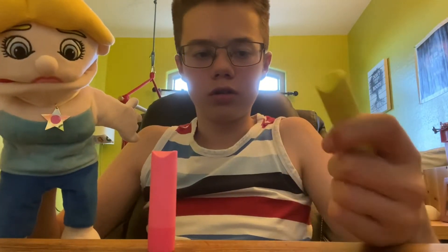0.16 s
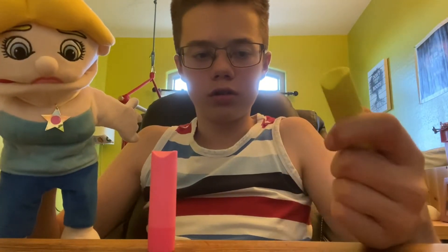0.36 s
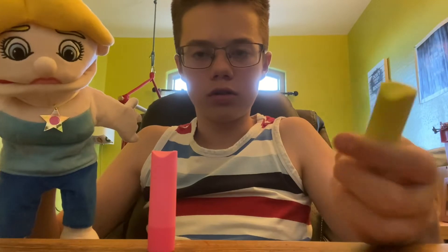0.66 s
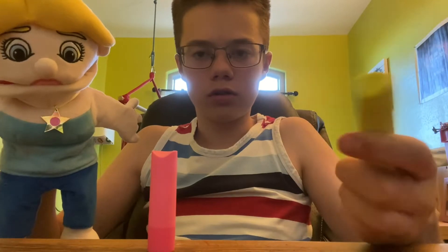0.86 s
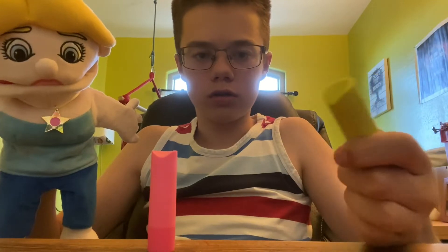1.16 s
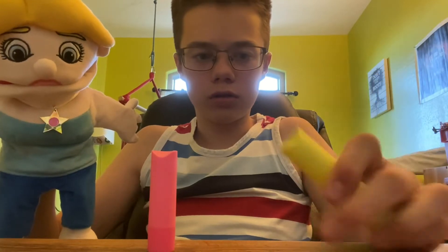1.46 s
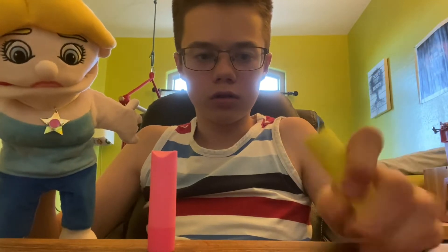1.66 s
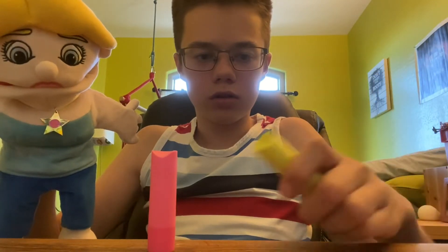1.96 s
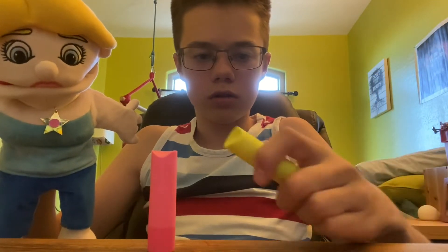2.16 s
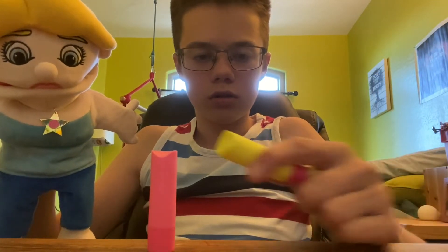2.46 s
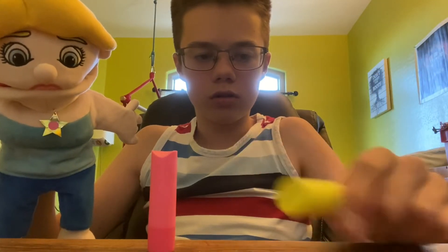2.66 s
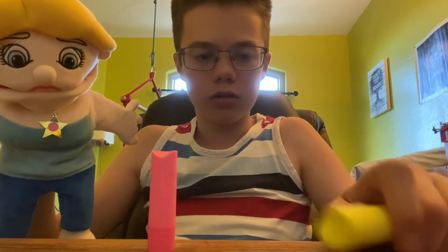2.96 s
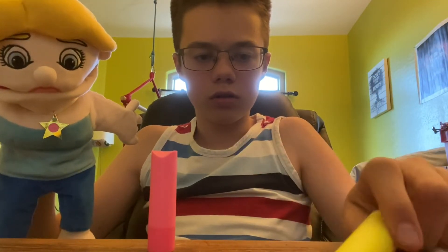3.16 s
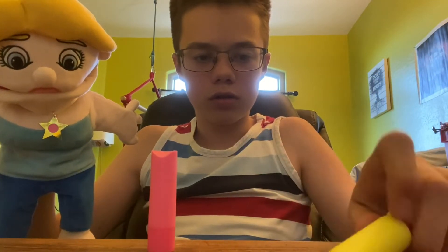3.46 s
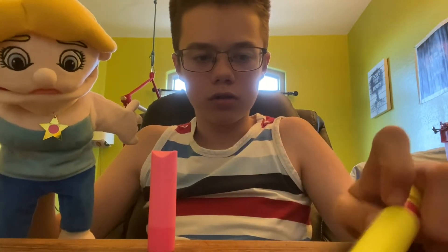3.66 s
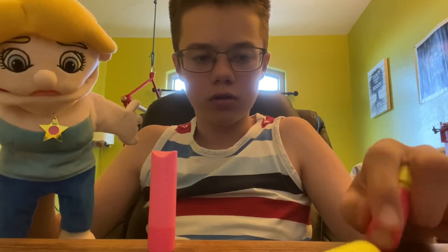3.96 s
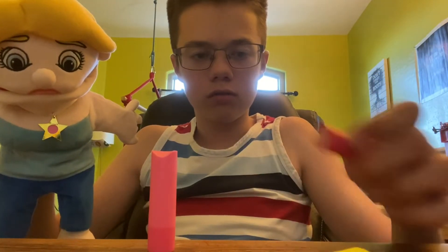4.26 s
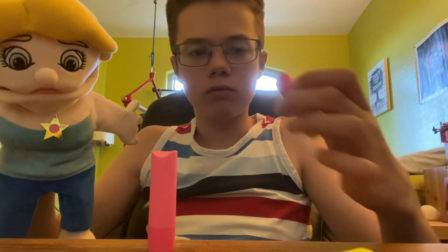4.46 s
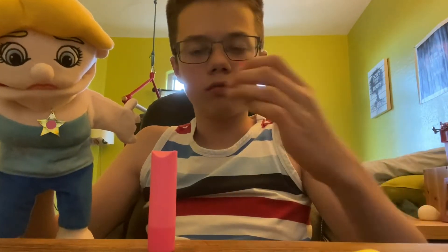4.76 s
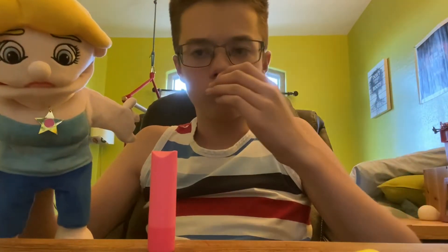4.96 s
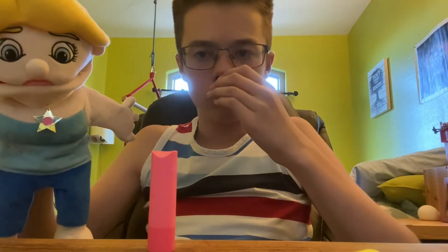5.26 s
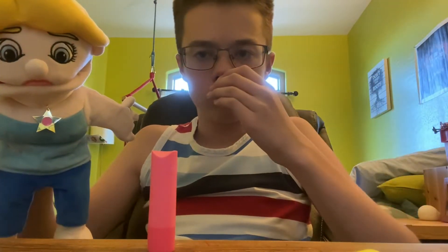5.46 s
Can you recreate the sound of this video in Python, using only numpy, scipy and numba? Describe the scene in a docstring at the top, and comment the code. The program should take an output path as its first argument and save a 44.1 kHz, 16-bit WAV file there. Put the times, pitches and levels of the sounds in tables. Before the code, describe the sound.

A small plastic tube is handled with faint rubs and ticks, its cap snaps sharply, then it drops and bounces on a wooden table.

```python
"""Small plastic tube handled at a table

A small plastic tube is turned in one hand close to a phone: friction noise for the rubbing fingers,
short decaying modes for its ticks and the snap of the cap. It is slid on a wooden table (rough noise
through the board's modes), tapped down and dropped with a few bounces (tube and board modes, rattle).
The furnished room is quiet: filtered-noise rumble, a low hum tone and a short diffuse echo.
"""
import sys
import numpy as np
from scipy import signal
from scipy.fft import rfft, irfft
from scipy.io import wavfile
from scipy.ndimage import uniform_filter1d
from numba import njit

SR = 44100
rng = np.random.default_rng(int(sys.argv[2]) if len(sys.argv) > 2 else 0)


def master_out(mix):
    """Clip the mix to full scale and print it as 16-bit PCM to the path in sys.argv[1]."""
    frames = np.transpose(np.atleast_2d(mix))
    ceiling = np.clip(frames, -1, 1)
    pcm = np.round(ceiling * 32767).astype(np.int16)
    wavfile.write(sys.argv[1], SR, pcm)


def amplitude_ratio(level_db):
    """Convert a level in decibels to the matching linear amplitude (field) ratio."""
    exponent = np.asarray(level_db, float) / 20
    return 10 ** exponent


N = 247036
TIME = np.arange(N) / SR

# the tube meets the table: start_s, peak_db, centre_hz, board_share_db, treble_share_db
KNOCK_EVENTS = [(3.049, -9, 2000, -7, -17.5), (3.0534, -15.5, 1180, -9, -30), (3.848, 0.5, 1906, -8, -9.5),
                (3.859, -18.5, 4040, -9, -11.5), (3.909, -4.5, 1660, -15.5, -12),
                (3.911, -11, 1600, -13, -13), (3.918, -21.5, 1500, -8, -16), (3.93, -19.5, 1360, -1.5, -21),
                (3.9555, -9, 1000, -8, -23.5), (3.983, -17, 1190, -2, -22), (4.002, -29.5, 900, 1.5, -30)]
# modes of the tube and cap, before the grip alters their decay: pitch_hz, level_db, t60_s
TUBE_MODES = [(597, 1, 0.035), (900, 6, 0.013), (1249, 3, 0.01), (1581, -2.5, .014), (2010, -6, .011),
              (2324, -1.5, .011), (2760, -4.5, 0.014), (3200, 0.5, 0.0081), (3694, -2.5, .009),
              (4590, -3, 0.0056), (5080, -2.5, 0.0052), (5900, 9, 0.0034), (7060, 3, 0.0038),
              (7850, -0.5, .006), (9700, -0.5, 0.0042), (10830, -2, 0.0042), (12400, 1.5, 0.0024),
              (14500, -5.5, 0.0032)]
# modes of the table top: pitch_hz, level_db, t60_s
BOARD_MODES = [(110, -8, 0.041), (167.7, -8, 0.079), (215.3, -3.5, 0.052), (286.2, -4.5, 0.058),
               (367.5, -5, .08), (467, -5.5, 0.096), (538.3, -4, .16), (623, -5.5, 0.071),
               (647.4, -7.5, 0.047), (733, -7.5, 0.063), (810, -7.5, 0.078), (923, -6.5, 0.056),
               (1001, -7.5, 0.035), (1135, -8.5, 0.024), (1228, -5, 0.048), (1337.4, -6.5, .07),
               (1561, -5, 0.064), (1766, -12, 0.068), (1964, -10.5, .04), (2200, -8, 0.031),
               (2450, -10.5, 0.029), (2541, -10, 0.0402)]


def colour(x, points):
    """Shape x by (Hz, dB) points joined on a log-frequency axis."""
    hz, db = np.transpose(points)
    f = np.maximum(np.arange(len(x) // 2 + 1) * SR / len(x), 1)
    gain_db = np.interp(np.log(f), np.log(hz), db)
    return irfft(rfft(x) * amplitude_ratio(gain_db), len(x))


def unit(x):
    """Scale to rms 1."""
    return x / np.sqrt(np.mean(x ** 2) + 1e-18)


def smooth(x, seconds):
    """Moving average."""
    return uniform_filter1d(x, max(int(seconds * SR), 1))


def decay(t, t60):
    """Exponential fade by 60 dB in t60 seconds."""
    return np.exp(-np.log(1000) * t / t60)


def wander(per_s):
    """Slow chance: a new random value per_s times a second, joined smoothly."""
    knots = np.arange(int(N / SR * per_s) + 2) / per_s
    return smooth(np.interp(TIME, knots, rng.standard_normal(len(knots))), .5 / per_s)


def add(out, s, sound, peak_db):
    """Place a sound at s seconds with the given peak."""
    i = int(s * SR)
    part = sound[:len(out) - i]
    out[i:i + len(part)] += part * amplitude_ratio(peak_db) / np.abs(sound).max()


def ring(modes, weight_db, phase, seconds):
    """Sum of decaying modes; each needs about a cycle to build, so the top arrives first."""
    hz, db, t60 = (c[:, None] for c in np.transpose(modes))
    t = np.arange(int(seconds * SR)) / SR
    waves = np.sin(2 * np.pi * hz * t + np.reshape(phase, (-1, 1))) * decay(t, t60)
    build = 1 - np.exp(-(t * hz / 0.46) ** 2)
    level = amplitude_ratio(db + np.reshape(weight_db, (-1, 1)))
    return (level * waves * build).sum(axis=0)


def grit(spread_db, clump_s):
    """Skin and grain catch unevenly: noise in short clumps of heavy-tailed size."""
    size = max(int(clump_s * SR), 1)
    catches = np.repeat(rng.exponential(size=N // 20)[:N // size + 1], size)
    clumps_db = spread_db * smooth(np.resize(catches, N), clump_s)
    return unit(rng.standard_normal(N) * amplitude_ratio(clumps_db))


@njit
def svf(x, hz, q):
    """State-variable band-pass with a moving centre."""
    y, b, l, k = np.empty(len(x)), 0., 0., 1 / q
    for i in range(len(x)):
        g = np.tan(np.pi * hz[i] / SR)
        v = (b + g * (x[i] - l)) / (1 + g * (g + k))
        b, l, y[i] = 2 * v - b, l + 2 * g * v, k * v
    return y


def hum():
    """Distant ventilation rumble and microphone hiss as shaped noise, under a wavering low sine."""
    # spectrum shape of rumble and hiss: frequency_hz, relative_level_db (per Hz)
    spectrum = [(15, -61), (25, -28.5), (61, -9.5), (123, -3.5), (157, -4.5), (190, -4.5), (344, -5),
                (451, -5), (560, -16), (754, -18), (840, -22), (988, -18), (1740, -30.5), (7710, -38.5),
                (16000, -50.5)]
    noise_db = -57  # rms
    tone_hz, tone_db, waver_db, waver_per_s = 124.9, -66, 2, 4
    steady = unit(colour(rng.standard_normal(N), spectrum))
    tone_level = amplitude_ratio(tone_db + waver_db * wander(waver_per_s))
    tone = np.sqrt(2) * np.sin(2 * np.pi * tone_hz * TIME)
    return amplitude_ratio(noise_db) * steady + tone_level * tone


def room(x):
    """Diffuse tail after a short gap, each band of noise fading at its own rate."""
    # reverberation of the furnished room: centre_hz, t60_s
    fading = [(250, 0.38), (500, 0.27), (1000, 0.46), (2000, .4), (4000, 0.25), (8000, 0.32), (16000, 0.16)]
    echo_db, gap_s = -13.5, 0.0027
    t = np.arange(int(.6 * SR)) / SR
    tail, noise = 0, rng.standard_normal(len(t))
    for hz, t60 in fading:
        band = colour(noise, [(hz / 4, -40), (hz / 2, -14), (hz, 0), (hz * 2, -14), (hz * 4, -40)])
        tail = tail + band * decay(t, t60)
    # silent for half the gap, then fading in over one gap
    tail = tail * np.clip(t / gap_s - .5, 0, 1)
    return amplitude_ratio(echo_db) * signal.fftconvolve(x, tail / np.sqrt(np.sum(tail ** 2)))[:N]


def slides():
    """Rough contact noise near each slide's centre, heard directly and through the board's modes."""
    # the tube slides and rolls on the table: start_s, length_s, pressure_db, centre_hz
    strokes = [(1.591, 0.039, -47, 830), (2.689, 0.034, -48.5, 1193), (2.804, 0.11, -59, 1154),
               (3.052, .07, -39, 560), (3.075, .06, -43, 1200), (3.144, 0.22, -53.5, 900),
               (3.23, .08, -43.5, 640), (3.365, .045, -45.5, 800), (3.497, .035, -42.5, 900),
               (3.527, .08, -38, 526), (3.62, .045, -28, 919), (3.671, .085, -40, 1100),
               (3.783, 0.058, -32.5, 810)]
    attack_s, sag_db = .016, 13.5  # each slide bites quickly, then weakens as it slows
    pressure, centre_hz = np.zeros(N), np.full(N, 560.)
    for s, length, db, hz in strokes:
        t = TIME - s
        on = (t >= 0) & (t < length)
        bite = np.minimum(t / attack_s, 1) ** 2
        level_db = db - sag_db * np.maximum(t - attack_s, 0) / length
        pressure[on] += (amplitude_ratio(level_db) * bite)[on]
        centre_hz[TIME >= s] = hz
    drive = svf(grit(2.4, 0.0034), centre_hz, 1.6)
    modes = ring(BOARD_MODES, 0, rng.uniform(0, 2 * np.pi, len(BOARD_MODES)), 0.41)
    contact = drive * smooth(pressure, .006)
    # both paths are scaled by what the unpressed drive would give
    board = signal.fftconvolve(contact, modes)[:N] / np.std(signal.fftconvolve(drive, modes))
    return board + amplitude_ratio(-9) * contact / np.std(drive)


def chatter():
    """Fine rattle of the loose parts, dying away after every knock; sharp blows shake them most."""
    under_treble_db, t60_s, rattle_hz = -26, .14, 3800
    shake, centre_hz = np.zeros(N), np.full(N, 1. * rattle_hz)
    fade = decay(TIME[:SR // 3], t60_s)
    for s, db, _, _, treble_db in KNOCK_EVENTS:
        add(shake, s, fade, db + treble_db + under_treble_db)
    rattle = svf(svf(grit(2.2, .001), centre_hz, .9), centre_hz, .9)
    return shake * unit(rattle)


def thuds():
    """The hand's weight reaches the table: single low modes that die within a few cycles."""
    # soft low blows: start_s, peak_db, pitch_hz
    blows = [(.142, -39.5, 300), (.155, -39, 68), (.197, -38.5, 85), (2.179, -25, 330.6),
             (3.847, -33.5, 110), (3.954, -37, 110)]
    out = np.zeros(N)
    for s, db, hz in blows:
        add(out, s, ring([(hz, 0, 4.3 / hz)], 0, 0, 0.15), db)
    return out


def tube_ring(centre_hz, octaves, treble_db, ring_share, phase):
    """A blow picks the wall modes near one centre; a sharp edge adds the top; the grip alters the decay."""
    modes = np.array(TUBE_MODES) * [1, 1, np.clip(ring_share, .1, 3)]
    hz = modes[:, 0]
    near_centre_db = -6 * (np.log2(hz / centre_hz) / octaves) ** 2
    weight_db = np.where(hz > 5500, treble_db, near_centre_db)
    return ring(modes, weight_db, phase, .04)


def knocks():
    """Tube click plus the longer ring of the board, whose modes each blow excites by chance."""
    out = np.zeros(N)
    chance = rng.standard_normal((len(KNOCK_EVENTS), len(TUBE_MODES) + 2 * len(BOARD_MODES)))
    for (s, db, hz, board_db, treble_db), c in zip(KNOCK_EVENTS, chance):
        phase, spot = c[len(TUBE_MODES):].reshape(2, -1)
        # every landing spot excites the modes in other proportions
        sound = amplitude_ratio(board_db) * ring(BOARD_MODES, 4.2 * spot, 1.36 * phase, .3)
        click = tube_ring(hz, 1.39, treble_db, 1.1, 1.43 * c[:len(TUBE_MODES)])
        sound[:len(click)] += click
        add(out, s, sound, db)
    return out


def rubs():
    """Each stroke: friction hiss in a broad band coloured by the wall, with an airy top, swelling and fading."""
    # fingers rub the smooth wall: start_s, length_s, level_db, treble_share_db
    strokes = [(.429, .063, -74.5, 9), (0.516, .087, -66, 4), (0.655, .034, -66.5, -10),
               (0.887, .071, -75, 5), (1.248, .09, -63, 4), (1.309, 0.098, -64.5, 1),
               (1.587, .065, -57.5, -0.5), (1.719, .044, -46, -10.5), (1.805, .045, -63.5, -23),
               (1.859, .037, -76, 4), (1.915, .048, -69, -10), (1.985, .048, -64, -6),
               (2.026, .17, -65, -7.5), (2.08, .017, -61, 3), (2.257, .063, -70.5, 4),
               (2.349, .089, -66.5, -2.5), (2.459, .063, -64, -8), (2.651, .075, -72, 0.14),
               (2.797, .046, -72, 2.5), (2.918, .09, -64.5, -5.5), (3.231, 0.083, -63, 3),
               (3.383, .062, -68.5, 6), (3.5, 0.068, -66, -3), (3.622, 0.027, -55.5, -5.5),
               (3.684, .016, -63.5, -14), (3.788, .023, -50.5, -13), (3.813, .068, -66.5, -14)]
    # colour that the hollow tube lends to a rub: frequency_hz, gain_db
    wall = [(880, -36.5), (1500, -5.5), (1850, -7), (2480, 2.5), (3270, -8), (4540, -2), (5450, -13.5),
            (6430, -5), (7870, -19.5), (8750, -12.5), (10900, -14.5), (12600, -8), (15000, -16)]
    band_hz, airy = 3300, [(5000, -1.0), (8000, -1.5), (13000, -5.0), (16500, -5.5)]
    band = unit(svf(colour(grit(3.8, 0.00089), wall), np.full(N, 1. * band_hz), 0.35))
    top = unit(colour(grit(2.3, 0.00085), airy))
    # for a moment the fingers also shift faintly while the tube is turned
    fidget_start_s, fidget_end_s, fidget_db, swing_db, swings_per_s = 2.1, 2.4, -80, 5, 11
    turning = smooth(1. * ((TIME > fidget_start_s) & (TIME < fidget_end_s)), .05)
    out = turning * amplitude_ratio(fidget_db + swing_db * wander(swings_per_s)) * (band + top)
    for s, length, db, treble_db in strokes:
        i, size = int(s * SR), int(length * SR)
        swell = np.sin(np.pi * np.arange(size) / size) ** 1.2
        hiss = band[i:i + size] + amplitude_ratio(treble_db) * top[i:i + size]
        out[i:i + size] += amplitude_ratio(db) * swell * hiss
    return out


def ticks():
    """Short dry clicks and the cap's snap: tube modes damped by the fingers."""
    # plastic in the hand: start_s, peak_db, centre_hz, spread_octaves, treble_share_db
    clicks = [(.140, -40.5, 990, 1.2, -21), (.186, -47.5, 3000, 1.7, -4), (0.519, -46, 2600, .7, -5),
              (0.525, -25.5, 3190, .74, -6.5), (0.666, -51, 2980, 1.06, -21), (.709, -39, 3200, 1.1, -11),
              (0.781, -52, 2490, 1.6, -7), (0.934, -43, 900, 1.33, -25), (1.123, -45, 3800, 0.89, 0),
              (1.607, -45, 1300, 0.76, -15), (1.625, -29.5, 4200, 0.53, -2), (1.737, -51, 3300, 1.1, -6),
              (1.750, -34.5, 3360, 0.79, -1), (1.886, -36.5, 1650, 0.59, -43),
              (1.922, -37.5, 2200, 1.5, -35), (2.093, -39, 1500, 2, -12), (2.177, 0, 2450, .62, -15),
              (2.512, -42, 1714, .58, -22.5), (2.572, -49, 4100, 1.1, 1), (2.587, -31.5, 1365, 1.66, -20),
              (2.674, -48, 1990, 1.2, -13), (2.703, -37.5, 1566, .36, -19), (2.813, -46, 1150, 0.37, -23),
              (2.909, -19, 1300, 0.87, -1.5), (3.377, -29, 1437, .46, -27), (3.534, -34.5, 1224, 1.04, -27),
              (3.602, -25.5, 3330, 0.51, 1.5)]
    # bright ticks come from under the fingers, which cut their ring short
    loose_hz, grip_power = 1500, 0.72
    out, chance = np.zeros(N), rng.standard_normal((len(clicks), len(TUBE_MODES)))
    for (s, db, hz, octaves, treble_db), c in zip(clicks, chance):
        ring_share = (loose_hz / hz) ** grip_power
        add(out, s, tube_ring(hz, octaves, treble_db, ring_share, 0.9 * c), db)
    return out


def scene():
    """Hand and table sounds with their echo, thinned in the bass by the small microphone, over the hum."""
    # bass loss of the microphone: frequency_hz, gain_db
    mic = [(15, -30.5), (40, -11.5), (80, -4), (160, -2)]
    hand_room_db = -4  # the hand is nearer the microphone than the table top, so its clicks are drier
    friction = rubs() + slides() + chatter()
    near = ticks() + knocks() + thuds() + friction
    # the walls hear each blow from several sides, its modes in other phases each time
    echo = np.zeros(N)
    for _ in range(3):
        echo += room(amplitude_ratio(hand_room_db) * ticks() + knocks() + thuds() + friction) / np.sqrt(3)
    return (colour(near + echo, mic) + hum())[None]


def roll_off(x):
    """The treble ends steeply here."""
    return signal.sosfilt(signal.butter(12, 17080, fs=SR, output="sos"), x)


def record(dry):
    """The finished mix as the phone stores it."""
    return roll_off(dry)


dry = scene()
out = record(dry)
master_out(out)
```